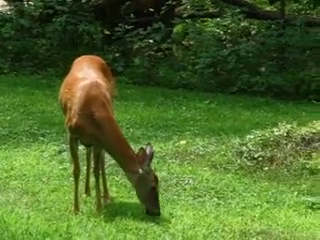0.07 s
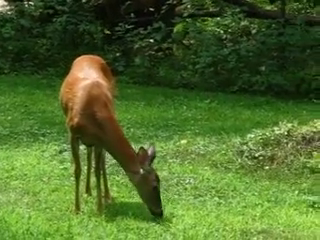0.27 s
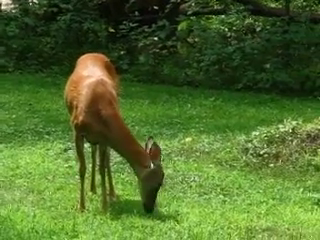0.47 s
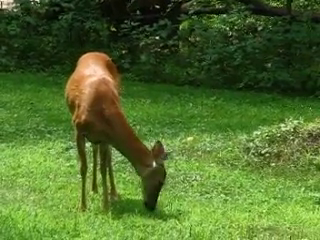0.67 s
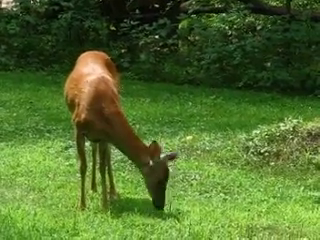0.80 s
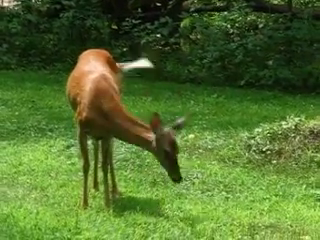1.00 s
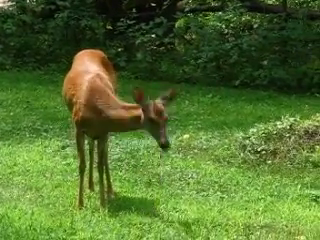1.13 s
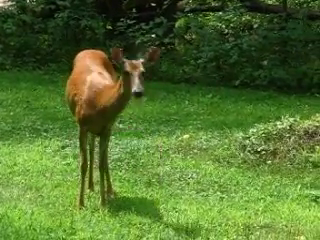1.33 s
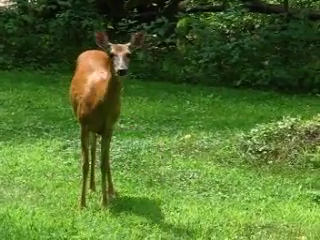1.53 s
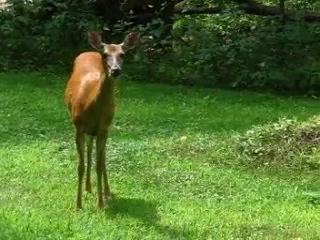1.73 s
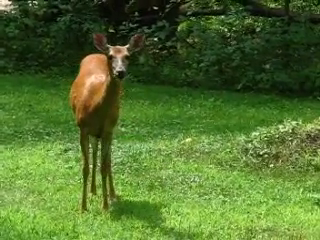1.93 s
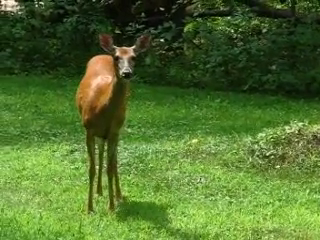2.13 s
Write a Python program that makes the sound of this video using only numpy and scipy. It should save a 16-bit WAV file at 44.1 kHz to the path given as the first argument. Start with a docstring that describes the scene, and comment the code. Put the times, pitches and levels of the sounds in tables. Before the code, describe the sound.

One sharp click from handling a small camera stands out over steady hiss and low rumble on a quiet lawn. A soft bump precedes it, a weaker one follows, and a faint distant engine swells near the end.

```python
"""A steady hiss over a low outdoor rumble, heard by a small hand-held camera on a quiet lawn.
A hand bumps the case softly, then one sharp click overloads the microphone. The camera's gain
control (its automatic volume) ducks and lets the hiss creep back. A weaker bump follows,
three faint hums come and go, and near the end a far engine swells briefly."""
import sys
import numpy as np
from scipy import signal
from scipy.fft import rfft, irfft
from scipy.io import wavfile
from scipy.ndimage import minimum_filter1d

SR = 44100
rng = np.random.default_rng(int(sys.argv[2]) if len(sys.argv) > 2 else 0)


def dump_mix(stems):
    """Bounce the given channels to the path in sys.argv[1] as a 16-bit WAV at rate SR."""
    frames = np.atleast_2d(stems).T  # one column per channel
    limited = np.clip(frames, -1, 1)  # hard clip at full scale
    pcm = np.round(limited * 32767).astype(np.int16)
    wavfile.write(sys.argv[1], SR, pcm)


N = 94815
TIME = np.arange(N) / SR
BANDWIDTH_HZ = 5720   # the camera loses sound above this pitch


def case_click():
    """A hard contact rings the case, and the contact itself rattles in a short crack."""
    # The case's ringing tones. Each row: pitch in Hz, level in dB, seconds to fade by 60 dB.
    case_modes = [(473, -10.5, 0.013), (756, -2.5, 0.011), (979, -3, 0.023), (1166, -2.5, 0.019),
                  (1640, -7.5, 0.016), (1861, -5, 0.023), (2328, -12, 0.032), (2687, -7, 0.019),
                  (3160, -10, 0.013), (3613, -10.5, 0.018), (4350, -10.5, .009), (5120, -5.5, .010)]
    start_s, strength_db = 0.447, -3.5
    crack_db, crack_fade_s = -12.5, 0.016
    band = signal.butter(2, [423, BANDWIDTH_HZ], "band", fs=SR, output="sos")
    rattle = rms_one(signal.sosfilt(band, rng.standard_normal(N)))
    fade = (TIME >= start_s) * from_db(crack_db - 60 * np.abs(TIME - start_s) / crack_fade_s)
    return strike([(start_s, strength_db)], case_modes) + fade * rattle


def hand_bumps():
    """A hand knocks the camera; the soft contact dulls its ringing."""
    # The knocks. Each row: start in seconds, strength in dB.
    knocks = [(.2225, -14.5), (.9735, -29.5)]
    # The held camera's low tones. Each row: pitch in Hz, level in dB, seconds to fade by 60 dB.
    low_modes = [(117.3, 1, 0.052), (185.4, 0.5, 0.037), (315, -10.5, 0.073), (386, -9, 0.077),
                 (635, -6, 0.02)]
    soften = signal.butter(2, 600, fs=SR, output="sos")
    return signal.sosfilt(soften, strike(knocks, low_modes))


def far_engine():
    """Only the engine's firing note carries this far; it rises as it swells."""
    # The engine's swell. Each row: time in seconds, firings per second, level in dB.
    swell = [(1.548, 75.5, -62), (1.72, 78.1, -54), (1.841, 83, -43), (1.929, 92.8, -52.5),
             (2.061, 91, -47.5), (2.12, 93.3, -68)]
    times, firing_hz, db = np.transpose(swell)
    cycles = np.cumsum(np.interp(TIME, times, firing_hz)) / SR + rng.random()
    return from_db(np.interp(TIME, times, db)) * rms_one(np.sin(2 * np.pi * cycles))


def distant_hums():
    """Brief soft tones that barely rise out of the hiss."""
    # The hums. Each row: loudest moment in seconds, pitch in Hz, level in dB.
    notes = [(.505, 276.6, -42), (1.087, 283, -48), (1.52, 563, -47)]
    width_s = 0.02
    sound = np.zeros(N)
    for peak_s, hz, db in notes:
        swell = np.exp(-((TIME - peak_s) / width_s) ** 2)
        sound += from_db(db) * swell * rms_one(np.sin(2 * np.pi * hz * TIME))
    return sound


def hiss_and_rumble():
    """The camera and garden hiss evenly over a narrow band of distant rumble."""
    # The tone colour of the hiss. Each row: frequency in Hz, relative level in dB.
    hiss_spectrum = [(25, 3), (45, 5), (130, 1), (240, -2), (520, 0.5), (950, -3.5), (1280, -1.5),
                     (1600, -5), (2100, -4), (2800, -2), (3500, -6.5), (3900, -6.5), (4500, -11.5),
                     (5150, -13.5), (5600, -18), (6100, -24.5)]
    centre_hz, width_hz = 73.6, 33
    edges_hz = [centre_hz - width_hz / 2, centre_hz + width_hz / 2]
    band = signal.butter(1, edges_hz, "band", fs=SR, output="sos")
    rumble = rms_one(signal.sosfilt(band, rng.standard_normal(N + SR))[SR:])
    return from_db(-40) * coloured_noise(hiss_spectrum) + from_db(-49.5) * rumble


def from_db(db):
    """Turn decibels into a multiplier."""
    return 10 ** (np.asarray(db) / 20)


def rms_one(x):
    """Scale a sound to an average power of 1."""
    return x / np.sqrt(np.mean(x ** 2) + 1e-20)


def coloured_noise(spectrum):
    """Steady noise shaped by rows of frequency in Hz and level in dB."""
    hz, db = np.transpose(spectrum)
    bins = np.maximum(np.fft.rfftfreq(N, 1 / SR), 1)
    gain = from_db(np.interp(np.log(bins), np.log(hz), db))
    return rms_one(irfft(rfft(rng.standard_normal(N)) * gain, N))


def ring(clicks, hz, fade_s):
    """Each click starts a tone that fades by 60 dB in fade_s seconds."""
    decay = from_db(-60 / (fade_s * SR))
    angle = 2 * np.pi * hz / SR
    return signal.lfilter([.5, 0, -.5], [1, -2 * decay * np.cos(angle), decay ** 2], clicks + 1e-18)


def strike(hits, modes):
    """Blows ring an object's natural tones (modes); neighbouring tones swing opposite ways."""
    clicks = np.zeros(N)
    for start_s, db in hits:
        clicks[int(start_s * SR)] = from_db(db)
    return sum((-1) ** k * from_db(db) * ring(clicks, hz, fade_s)
               for k, (hz, db, fade_s) in enumerate(modes))


def smooth(x, seconds):
    """Follow a signal with a lag, rounding off its jumps."""
    keep = np.exp(-1 / (seconds * SR))
    return signal.lfilter([1 - keep], [1, -keep], x)


def fall_back(x, seconds):
    """Jump to each peak at once, then sink gradually."""
    return np.exp(np.maximum.accumulate(np.log(x + 1e-12) + TIME / seconds) - TIME / seconds)


def gain_control(x):
    """A loud peak turns the volume down; it stays down a moment, then recovers."""
    threshold_db, attack_s, hold_s, release_s = -9, 0.0076, 0.069, 0.32
    excess_db = np.maximum(20 * np.log10(np.abs(x) + 1e-9) - threshold_db, 0)
    half_hold = int(hold_s * SR) // 2
    held_db = -minimum_filter1d(-excess_db, 2 * half_hold + 1, origin=half_hold)
    cut_db = smooth(fall_back(held_db, release_s), attack_s)
    # The amplifier's zero line jumps as the volume drops, then settles.
    settling = fall_back(excess_db / (excess_db.max() + 1e-9), seconds=0.8)
    zero_line = -0.0084 + 0.057 * smooth(settling, seconds=0.0031)
    return x * from_db(-cut_db) + zero_line


def scene():
    """All the sounds meet at one microphone."""
    return (hiss_and_rumble() + far_engine() + distant_hums() + case_click() + hand_bumps())[None]


def record(dry):
    """The camera rides the volume, adds circuit hiss, cuts the treble and rounds off loud peaks."""
    amplified = gain_control(dry[0]) + from_db(-53) * rng.standard_normal(N)
    narrow = signal.sosfiltfilt(signal.butter(16, BANDWIDTH_HZ, fs=SR, output="sos"), amplified)
    ceiling = 0.7   # the most the microphone's amplifier can put out
    clipped = narrow / (1 + (narrow / ceiling) ** 8) ** (1 / 8)
    top_cut = signal.butter(8, 16000, fs=SR, output="sos")
    return signal.sosfiltfilt(top_cut, clipped)[None]


dry = scene()
out = record(dry)
dump_mix(out)
```